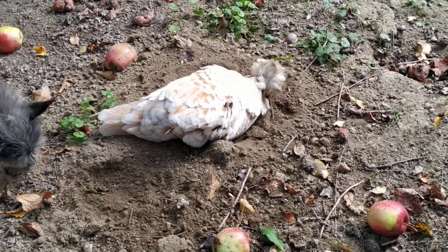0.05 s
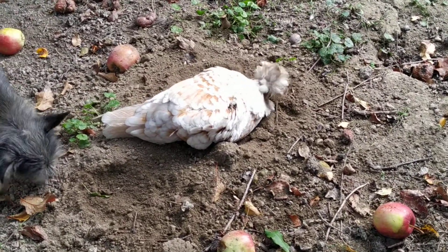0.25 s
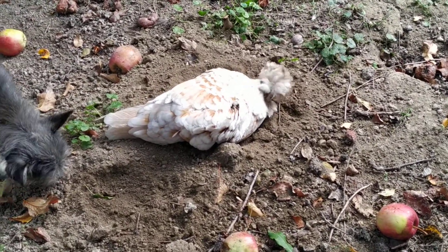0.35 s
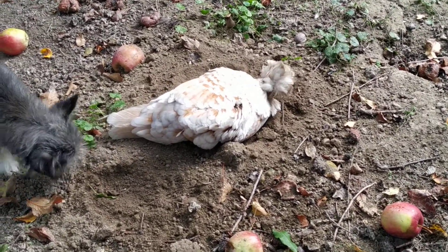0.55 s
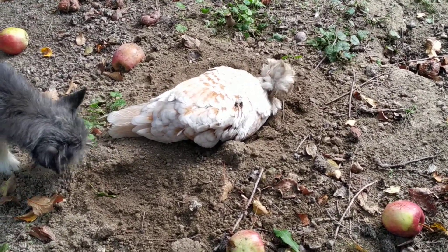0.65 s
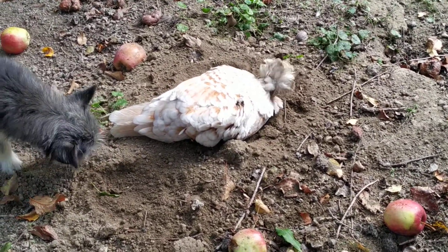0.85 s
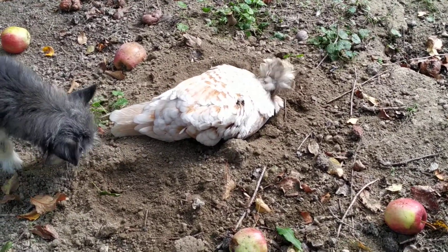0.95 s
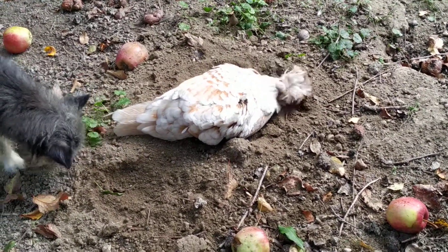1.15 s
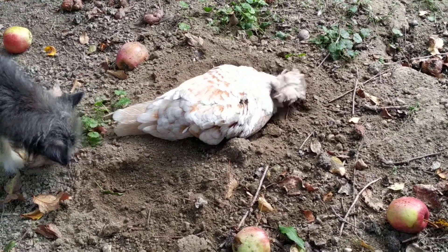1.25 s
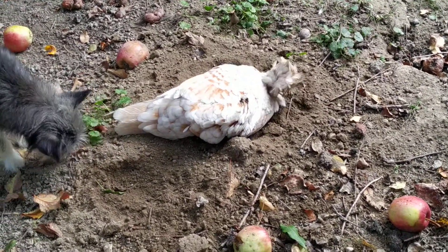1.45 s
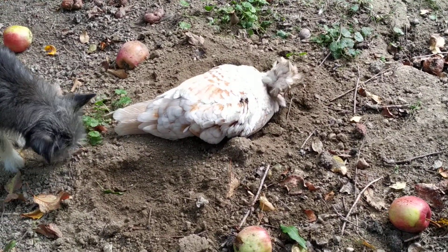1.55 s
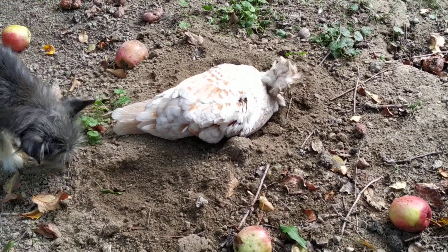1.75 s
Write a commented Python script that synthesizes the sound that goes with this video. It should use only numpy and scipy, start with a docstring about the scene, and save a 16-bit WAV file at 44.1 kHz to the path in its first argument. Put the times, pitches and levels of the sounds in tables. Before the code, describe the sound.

In a quiet garden, a small dog softly scuffs dry leaves and loose earth, with tiny crackles. Two louder, dull bumps hit the left of the microphone early on, and sparse rustles continue above a faint outdoor rumble.

```python
"""Dry scuffs and small ticks in a quiet garden: a small dog noses over soil and leaves beside a hen
lying in a dust bath. Each scuff shifts a cloud of tiny grains, twigs and leaves snap and ring, and
loose earth gives with a dull swish. Soft taps land right at the left microphone port and thump
well above the rustle. Under it all lie a low outdoor rumble and a faint, even hiss."""
import sys
import numpy as np
from scipy import signal
from scipy.fft import rfft, irfft, next_fast_len
from scipy.io import wavfile

SR = 44100
rng = np.random.default_rng(int(sys.argv[2]) if len(sys.argv) > 2 else 0)


def materialize(psi):
    """Save the field psi as 16-bit PCM at rate SR to the path in sys.argv[1].

    A 1-D psi becomes a single channel; in a 2-D psi each row is a channel.
    """
    bounded = np.clip(np.atleast_2d(psi).T, -1, 1)
    quanta = np.round(bounded * 32767).astype(np.int16)
    wavfile.write(sys.argv[1], SR, quanta)


N = 79380
TIME = np.arange(N) / SR
GRAIN_SIDE_DB = -2.5  # stereo width of grains and crackle: side against mid


# Moves through leaves and soil. Each row: peak time, rise and fall in seconds, then leaf, sand
# and dust levels in dB.
SCUFFS = [(.075, 0.28, .02, -70, -67.5, -89), (.251, 0.06, 0.025, -55, -54.5, -57.5),
          (0.323, 0.045, 0.084, -58, -59.5, -64.5), (0.442, 0.011, 0.021, -56.5, -67, -75),
          (.505, 0.023, 0.11, -70, -67, -70), (.670, 0.02, 0.02, -64, -63.5, -79),
          (.793, 0.04, 0.016, -64, -59.5, -70), (0.827, 0.012, 0.02, -82, -65, -57.5),
          (0.873, 0.0065, 0.035, -67.5, -64, -65), (1.056, 0.011, 0.042, -69, -70, -61.5),
          (1.170, 0.0077, 0.023, -80, -63.5, -70), (1.262, 0.019, 0.02, -85, -64.5, -67.5),
          (1.492, 0.002, 0.012, -74, -53.5, -52.5), (1.522, 0.018, 0.018, -52.5, -52, -68),
          (1.698, 0.02, 0.012, -60, -63.5, -76), (1.797, 0.013, .02, -60, -70, -70)]
# The tone of crumpling leaves, sliding sand and fine dust. Each row: frequency in Hz, relative dB.
LEAF_TONE = [(150, -2.5), (600, -14), (1200, -5.5), (1600, -7), (2100, -1.5), (2800, 1), (3700, -10.5),
             (6000, -14.5), (10000, -18.5), (16000, -13)]
SAND_TONE = [(300, -38), (1200, -5), (1700, -12), (3200, -5.5), (4600, 5.5), (6500, 0.5), (8500, 5.5),
             (11500, -9), (13000, -3), (15500, -20)]
DUST_TONE = [(4000, -19.5), (9000, -1), (12000, 0), (16000, -21)]

def scuffs():
    """Each move crumples leaves, slides sand and scatters dust; loose grit trickles throughout."""
    leaf, sand, dust = 0, 0, 0
    for at, rise, fall, leaf_db, sand_db, dust_db in SCUFFS:
        move = swell(at, rise, fall)
        leaf += undb(leaf_db) * move
        sand += undb(sand_db) * move
        dust += undb(dust_db) * move
    return (leaf * grains(LEAF_TONE, per_second=5000, spread_db=4.5)
            + sand * grains(SAND_TONE, per_second=16000, spread_db=1.5)
            + dust * grains(DUST_TONE, per_second=5000, spread_db=4.5)
            + undb(-72) * grains(SAND_TONE, per_second=300, spread_db=2.5))  # grit


def grains(tone, per_second, spread_db):
    """A cloud of tiny random clicks, mostly weak, a little different left and right."""
    hits = rng.random(N) < per_second / SR
    strength = undb(spread_db * np.minimum(rng.exponential(size=N), 4))
    signs = rng.choice([-1, 1], N)
    side = undb(GRAIN_SIDE_DB) * rng.standard_normal(N)
    return colour(hits * strength * stereo(signs, side), tone)


# Twigs and dry leaves. Each row: start in seconds, ring level in dB, pitch in Hz, decay in seconds,
# then crackle level in dB, centre in Hz, fall in seconds.
TICKS = [(0.0767, -53, 2700, 0.00034, -49.5, 6430, 0.0012),
         (0.1404, -42, 2620, 0.00054, -38.5, 5840, 0.00072), (0.2309, -42, 2010, .00045, -50, 6500, 0.0018),
         (0.2481, -37.5, 2460, 0.00022, -47, 7500, 0.0016),
         (0.2568, -39, 2360, 0.00032, -61, 5000, 0.00092), (0.2675, -42, 3030, 0.00024, -42, 6000, .0005),
         (0.298, -45.5, 1850, .00037, -46, 5930, .0012), (0.331, -49, 2300, 0.00042, -44, 5800, 0.0011),
         (.3470, -45.5, 2070, 0.00047, -42.5, 5750, 0.0011), (0.42, -48.5, 2290, 0.00035, -57, 4000, .0015),
         (0.4375, -47, 2340, 0.00082, -52, 3500, 0.0022), (0.4945, -51.5, 1670, 0.00084, -62, 4000, .001),
         (0.5202, -52, 1670, 0.001, -53.5, 3520, 0.0021), (0.6695, -37.5, 1400, 0.00038, -53, 2960, 0.0029),
         (.8080, -45, 1390, 0.00044, -53, 2800, 0.0017), (0.8083, -33, 2730, 0.00027, -40.5, 3620, 0.00087),
         (0.8671, -73, 2700, 0.00027, -47.5, 10500, 0.00071),
         (1.066, -60, 2670, 0.00088, -62, 8000, 0.0018), (1.7742, -51, 2370, .0005, -65, 4500, .0015)]

def ticks():
    """A twig or leaf breaks with a sharp crackle and rings for a few cycles."""
    port_time = TIME - np.array([[0], [0.00004]])  # the ring reaches the right a hair later
    out = np.zeros((2, N))
    for at, ring_db, hz, decay, crackle_db, crackle_hz, crackle_fall in TICKS:
        span = slice(int(at * SR), int(at * SR) + SR // 20)
        out[:, span] += undb(ring_db) * ring(port_time[:, span] - at, hz, decay)
        band = signal.iirpeak(crackle_hz, Q=3.2, fs=SR)
        crackle = unit(signal.lfilter(*band, wide_noise(GRAIN_SIDE_DB)))
        out += undb(crackle_db) * swell(at, rise=0.00017, fall=crackle_fall) * crackle
    return out * undb([[-0.5], [0.5]])  # a touch louder on the right


# Touches at the port. Each row: time in seconds, pressure in dB, its rise and fall in seconds,
# then scratch, knock and fine hiss levels in dB.
TAPS = [(0.2998, -34, 0.0002, 0.00021, -51, -57, -68), (0.3554, -11, 0.00041, 0.0033, -34, -23, -31.5),
        (0.737, -14.5, 0.00078, 0.0055, -61, -47, -37.5)]
# The tone of the contact, coarse and fine. Each row: frequency in Hz, relative dB.
SCRATCH_TONE = [(200, 9), (800, -2), (1400, 7.5), (2000, 6), (2700, -9), (3700, 2), (7000, -9),
                (16000, -10)]
FINE_HISS_TONE = [(1000, 1), (4000, -5), (6500, 1), (9000, 0), (12000, -3.5), (16000, -8)]
PORT_HZ, PORT_WIDTH_HZ = 58, 107  # resonance of the leaking port

def taps():
    """A touch sucks at the left port and scratches it; the casing knocks and rings hollow."""
    pressure, knock, hollow, coarse, fine = 0, 0, 0, 0, 0
    for at, db, rise, fall, scratch_db, knock_db, fine_db in TAPS:
        pressure += undb(db) * swell(at, rise, fall)
        # The casing sounds at first contact, just ahead of the pressure peak.
        knock += undb(knock_db) * ring(TIME - at + 0.00085, hz=1610, decay=0.00023)
        hollow += undb(db - 20) * ring(TIME - at + 0.002, hz=192.6, decay=0.00246)
        contact = swell(at, rise, fall=0.0035)
        coarse += undb(scratch_db) * contact
        fine += undb(fine_db) * contact
    # The leak acts as a high-pass, so the pressure swings back.
    leak = signal.bilinear([1, 0, 0], [1, 2 * np.pi * PORT_WIDTH_HZ, (2 * np.pi * PORT_HZ) ** 2], SR)
    thump = -signal.lfilter(*leak, pressure + knock + 1e-18) - hollow
    scratch = coarse * colour(rng.standard_normal((2, N)), SCRATCH_TONE)
    scratch += fine * colour(rng.standard_normal((2, N)), FINE_HISS_TONE)
    right_bleed = undb(-48) * thump + undb(-18.5) * scratch[1]
    return np.array([thump + scratch[0], right_bleed])


# Soft earth giving way. Each row: peak time in seconds, level in dB, centre in Hz.
PRESSES = [(0.243, -59, 168), (0.858, -63, 870), (1.06, -73, 225)]

def presses():
    """Loose earth yields with a short, dull swish."""
    out = 0
    for at, db, hz in PRESSES:
        swish = unit(steep_band(wide_noise(side_db=-6), hz, q=1.8))
        out += undb(db) * swell(at, rise=0.016, fall=0.02) * swish
    return out


def garden_scatter(x):
    """Ground and plants scatter the sound into a short, thin tail."""
    t = TIME[:SR // 4]
    tail = rng.standard_normal((2, len(t))) * np.exp(-t / 0.02)
    tail /= np.sqrt(np.sum(tail ** 2, axis=1, keepdims=True))
    return x + undb(-4.5) * signal.fftconvolve(x, tail, axes=1)[:, :N]


# The tone of the outdoor bed, mid and side. Each row: frequency in Hz, relative dB.
AIR_MID_TONE = [(20, -3), (40, -2.5), (70, -13), (110, -9), (160, -18.5), (280, -20), (490, -25.5),
                (750, -26.5), (1500, -33), (2700, -29), (3500, -31.5), (4600, -30.5), (8500, -33),
                (10000, -36.5), (15500, -38.5)]
AIR_SIDE_TONE = [(20, 4), (40, -18), (64, -3), (120, -16), (480, -20), (1670, -19), (2600, -17.5),
                 (8500, -20.5), (10000, -23.5), (15500, -27)]
# The fader ride on the low drone. Each row: time in seconds, relative level in dB.
DRONE_RIDE = [(0, -53.5), (.06, -51), (.25, -56), (.3, -59), (.55, -59.5), (.68, -51.5), (.8, -56),
              (.88, -64), (1.0, -60), (1.1, -54.5), (1.38, -54), (1.44, -64), (1.55, -55.5), (1.8, -59.5)]
DRONE_START_HZ, DRONE_WIDTH_HZ, DRONE_RISE_HZ_PER_S = 51.06, 14.2, 7

def air():
    """Low rumble and wide hiss, with a centred, swelling drone whose pitch wanders and creeps up."""
    mid = undb(-56.5) * colour(rng.standard_normal(N), AIR_MID_TONE)
    side = undb(-62) * colour(rng.standard_normal(N), AIR_SIDE_TONE)
    low_noise = steep_band(rng.standard_normal(N), DRONE_START_HZ, q=DRONE_START_HZ / DRONE_WIDTH_HZ)
    wandering_phase = np.angle(signal.hilbert(low_noise))
    drone = unit(np.cos(wandering_phase + np.pi * DRONE_RISE_HZ_PER_S * TIME ** 2))
    drone_db = np.interp(TIME, *np.array(DRONE_RIDE).T) - 2.5
    return stereo(mid + undb(drone_db) * drone, side)


def swell(at, rise, fall):
    """An envelope that grows to 1 at a moment and dies away."""
    t = TIME - at
    return np.exp(-np.where(t < 0, -t / rise, t / fall))


def ring(age, hz, decay):
    """A resonance that builds up quickly and dies; its envelope peaks at 1."""
    age = np.maximum(age, 0)
    return age / decay * np.exp(1 - age / decay) * np.sin(2 * np.pi * hz * age)


def colour(x, tone):
    """EQ through (Hz, dB) points; the result has rms 1."""
    hz, db = np.array(tone, float).T
    size = next_fast_len(2 * N, real=True)
    freqs = np.maximum(np.fft.rfftfreq(size, 1 / SR), 1)
    gain = undb(np.interp(np.log(freqs), np.log(hz), db))
    cepstrum = irfft(np.log(gain), size)
    cepstrum[1:size // 2] *= 2  # minimum phase: nothing rings ahead of a click
    cepstrum[size // 2 + 1:] = 0
    response = np.exp(rfft(cepstrum))
    return unit(irfft(rfft(x, size) * response, size)[..., :N])


def steep_band(x, hz, q):
    """Two passes through one band-pass."""
    band = signal.iirpeak(hz, q, SR)
    return signal.lfilter(*band, signal.lfilter(*band, x))


def wide_noise(side_db):
    """White noise, its stereo width set by the side level."""
    return stereo(rng.standard_normal(N), undb(side_db) * rng.standard_normal(N))


def stereo(mid, side):
    """Mid and side to left and right."""
    return np.array([mid + side, mid - side])


def undb(db):
    """Decibels to gain."""
    return 10 ** (np.asarray(db) / 20)


def unit(x):
    """Scale to rms 1."""
    return x / np.sqrt(np.mean(x ** 2))


def scene():
    """Ground rustle with a short tail, dry close taps and the garden air."""
    return garden_scatter(scuffs() + ticks() + presses()) + taps() + air()


def record(dry):
    """A steep high cut at 15.7 kHz."""
    return signal.sosfilt(signal.ellip(10, .2, 70, 15700, fs=SR, output="sos"), dry)


dry = scene()
out = record(dry)
materialize(out)
```